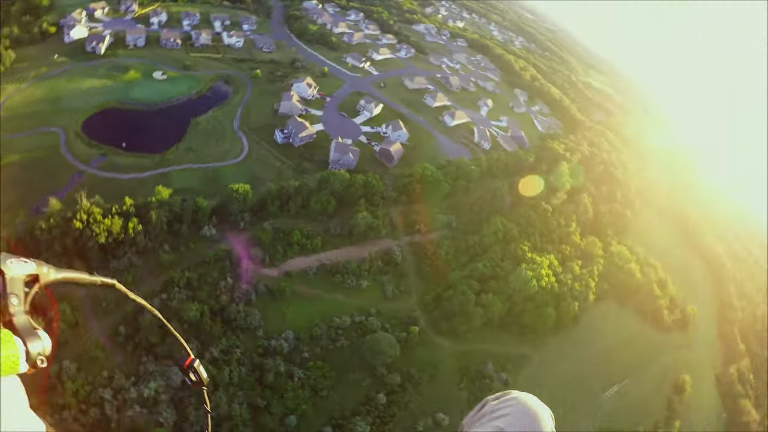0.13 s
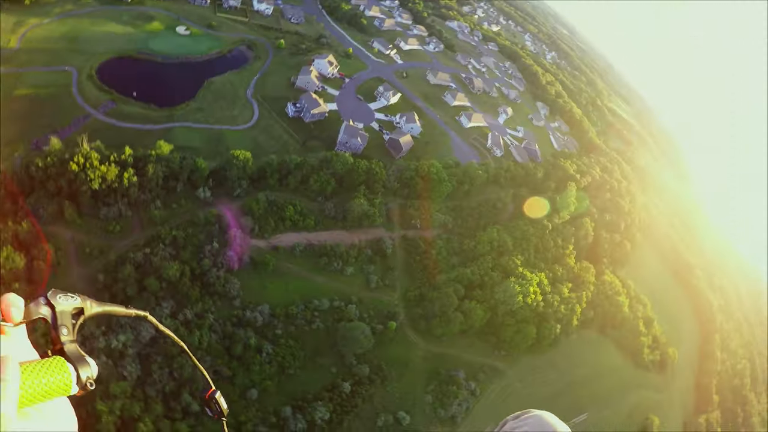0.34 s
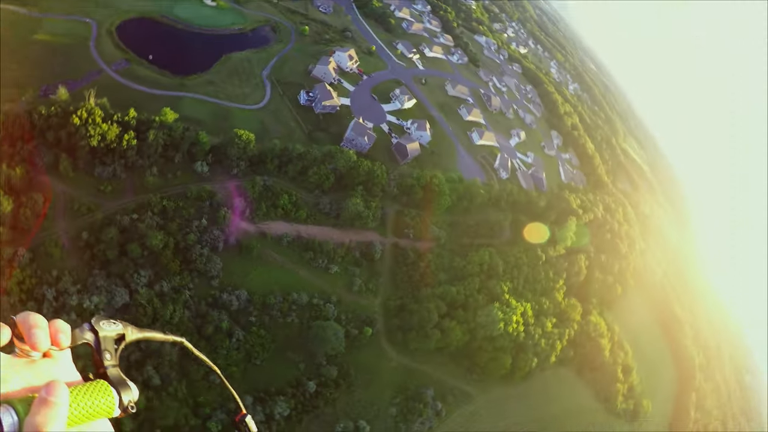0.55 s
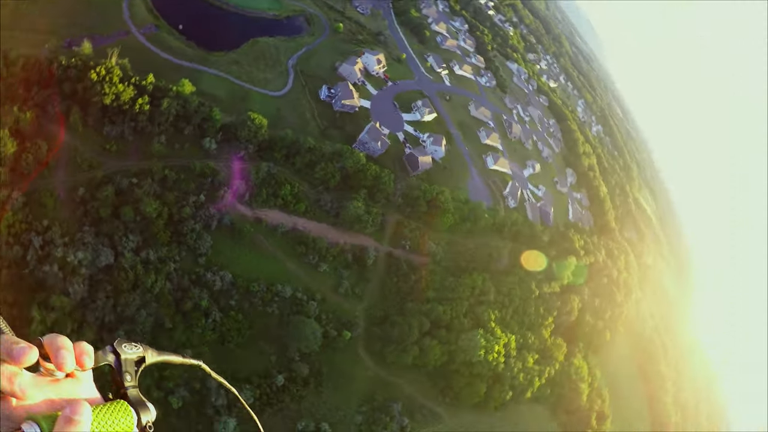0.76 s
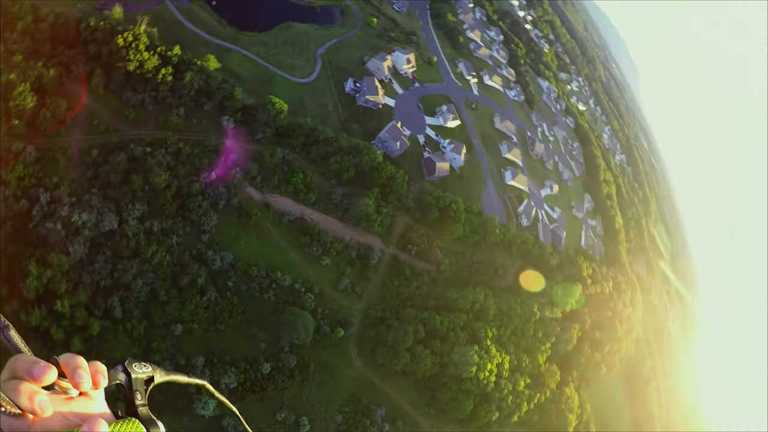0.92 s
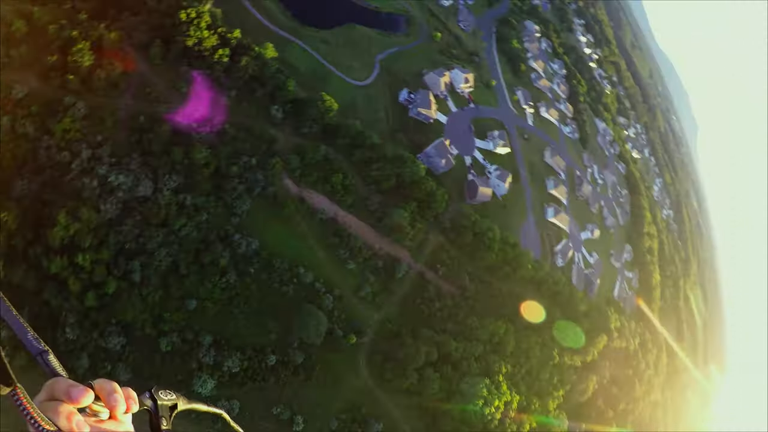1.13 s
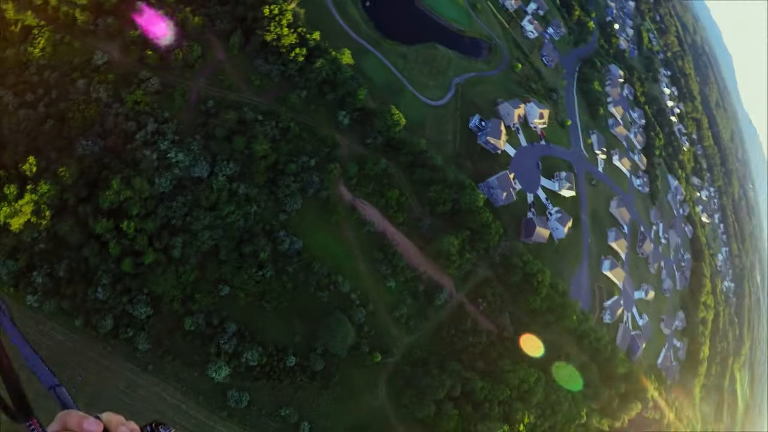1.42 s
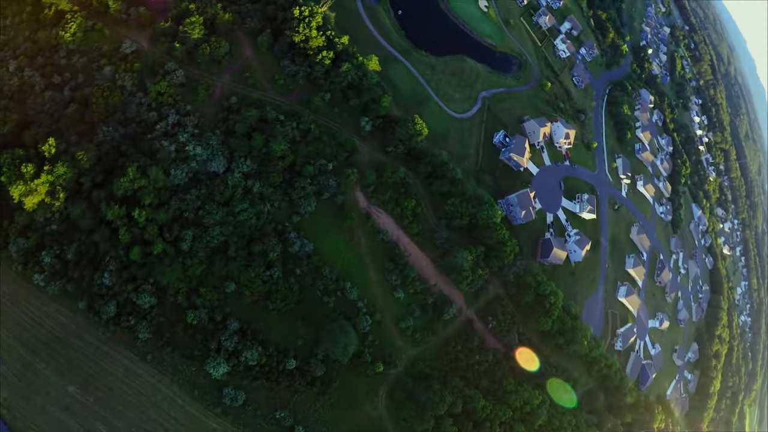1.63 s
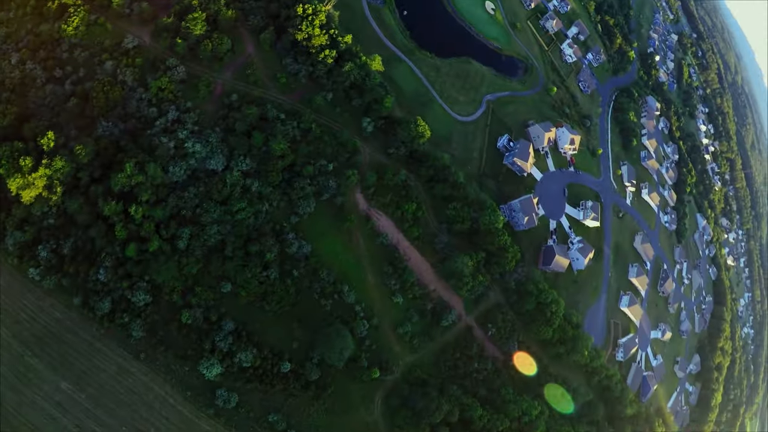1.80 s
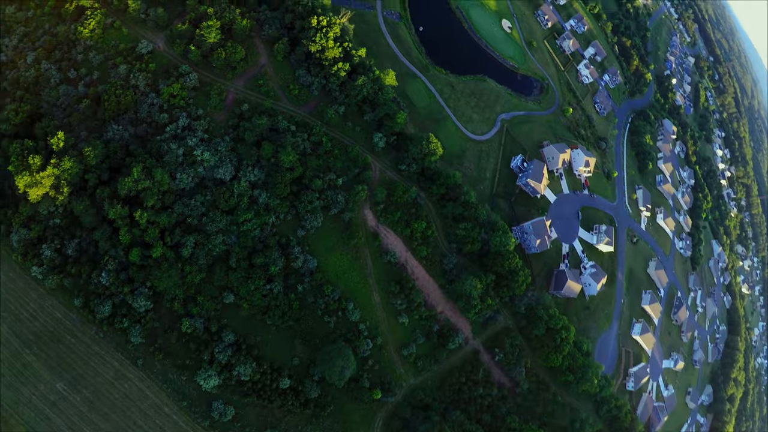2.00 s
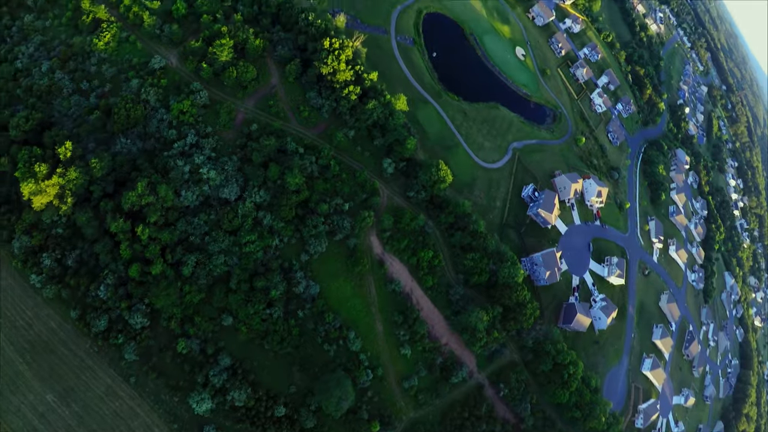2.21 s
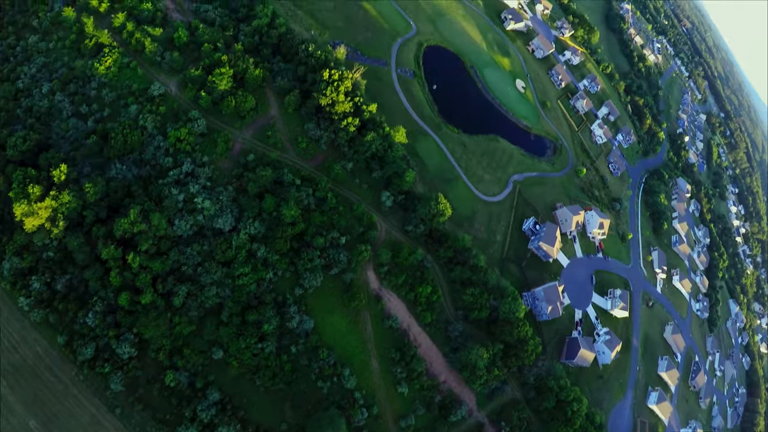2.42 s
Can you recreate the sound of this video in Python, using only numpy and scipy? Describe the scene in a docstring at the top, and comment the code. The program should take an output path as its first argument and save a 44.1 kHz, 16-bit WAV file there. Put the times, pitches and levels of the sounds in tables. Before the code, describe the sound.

Wind buffets an exposed microphone aboard a powered paraglider, with dull low rumble and sharp pops. A breathy rush throbs with the propeller, slowly speeding up and strengthening, with a strong late burst. Open air, close microphone.

```python
"""Gusts buffet the microphone port of a powered paraglider: a dull rumble of shaped noise with sharp pops.
Over it a brighter rush, noise ringing the resonances of the housing, throbs once per propeller blade
as the engine slowly spins up. A narrow ring of the housing wakes up late, and a thin treble of air
flickers on top. Faint circuit hiss and a comb of steady sine whine lie underneath."""
import sys
import numpy as np
from scipy import signal
from scipy.fft import rfft, irfft, next_fast_len
from scipy.io import wavfile
from scipy.ndimage import uniform_filter1d

SR = 44100
rng = np.random.default_rng(int(sys.argv[2]) if len(sys.argv) > 2 else 0)


def materialize(psi):
    """Save the field psi as 16-bit PCM at rate SR to the path in sys.argv[1].

    A 1-D psi becomes a single channel; in a 2-D psi each row is a channel.
    """
    bounded = np.clip(np.atleast_2d(psi).T, -1, 1)
    quanta = np.round(bounded * 32767).astype(np.int16)
    wavfile.write(sys.argv[1], SR, quanta)


N = 112454


def undb(db):
    """Gain of a level in dB."""
    return 10 ** (np.asarray(db) / 20)


def read(table, hz):
    """A spectrum table read on a log-frequency axis."""
    table_hz, values = np.array(table, float).T
    return np.interp(np.log(np.maximum(hz, 1)), np.log(table_hz), values)


def follow(table, t):
    """Moving curves drawn through a table: time in the first column, one curve per other column."""
    rows = np.array(table, float)
    return [np.interp(t, rows[:, 0], column) for column in rows[:, 1:].T]


def walk(rate):
    """Random levels held 1 / rate s and slewed twice, without slow drift; spread 1."""
    hold = max(int(SR / rate), 1)
    steps = np.repeat(rng.standard_normal(N // hold + 1), hold)
    slewed = uniform_filter1d(uniform_filter1d(steps, hold), hold)[:N]
    level = slewed - uniform_filter1d(slewed, 5 * hold)
    return level / level.std()


def bands(colour, gain):
    """Coloured noise, rms 1 before the gains, in overlapping half octaves that each move on their own gain."""
    size = next_fast_len(N)
    hz = np.arange(size // 2 + 1) * SR / size
    noise = rfft(rng.standard_normal(size)) * undb(colour(hz))
    half_octave = 2 * np.log2(np.maximum(hz, 1))
    out = 0
    for k in range(7, 29):  # centres from 11 Hz to 16 kHz
        share = np.cos(np.pi / 2 * np.clip(half_octave - k, -1, 1)) ** 2
        out = out + irfft(noise * share, size)[:N] * gain(2 ** (k / 2))
    return out / irfft(noise, size).std()


def throb_gain(depth, chop):
    """Blade throb as a power swing around 1, kept above zero."""
    return np.sqrt(np.clip(1 + depth * chop, .05, 4))


HISS_DB = -80
WHINE_HZ, WHINE_DB, WHINE_FALL_DB = 1000, -91.5, -1.3  # spacing, lowest tone, step per tone


def circuit(t):
    """Even hiss and a faint comb of steady whine from 8 to 15 kHz, weaker towards the top."""
    hiss = undb(HISS_DB) * rng.standard_normal(N)
    whine = 0
    for k in range(8):
        turns = (k + 8) * WHINE_HZ * t + rng.random()
        whine = whine + undb(WHINE_FALL_DB * k) * np.sin(2 * np.pi * turns)
    return hiss + undb(WHINE_DB) * whine


# blade rate at the start, its rise, and the growth of that rise
BLADE_HZ, SPIN_UP_HZ_PER_S, SPIN_UP_HZ_PER_S2, BLADE_START_TURNS = 33.65, 4.1, .5, .13
BLADE_SCATTER_DB = 1.5
THROB_GROWTH_S = 1.3  # time in which the throb would grow by its full depth


def blades(t, lag_turns=0):
    """A swell for each blade pass, each of its own size, deepening as the engine takes load."""
    spin_up = SPIN_UP_HZ_PER_S * t ** 2 / 2 + SPIN_UP_HZ_PER_S2 * t ** 3 / 3
    turns = BLADE_START_TURNS - lag_turns + BLADE_HZ * t + spin_up
    sizes = undb(BLADE_SCATTER_DB * rng.standard_normal(N // 100))
    size = sizes[(turns + .25).astype(int)]  # a new size a quarter turn ahead of each crest
    wave = np.cos(2 * np.pi * turns) + 0.34 * np.cos(4 * np.pi * turns)
    return wave * size * np.clip(0.1 + t / THROB_GROWTH_S, 0, 1)


# Spectrum of the top treble of the airstream: frequency_hz, density_db (per Hz, relative)
AIR_SPECTRUM = [(5000, -29), (7000, 1.5), (9000, -2), (12000, -5), (15500, -13)]


def air(level_db, chop):
    """The thin top of the airstream: treble noise flickering in quick puffs and lightly throbbing."""
    puffs = undb(.9 * walk(rate=240)) * throb_gain(0.28, chop)
    return undb(level_db) * bands(lambda hz: read(AIR_SPECTRUM, hz), lambda hz: puffs)


RING_HZ, RING_WIDTH_HZ = 1625, 110  # width where the ring is 6 dB down
# Level of the narrow housing ring over time: start_s, level_db (before the throb)
RING_LEVEL = [(0, -82), (1.5, -76), (1.88, -70), (1.93, -61), (2.07, -65), (2.12, -58), (2.28, -68),
              (2.35, -58), (2.54, -61)]


def ring(t, chop):
    """A narrow resonance of the housing that wakes up late, pumped by the blade passes."""
    colour = lambda hz: -20 * np.log10(1 + (2 * (hz - RING_HZ) / RING_WIDTH_HZ) ** 2)
    pump = throb_gain(0.6, chop)
    level_db, = follow(RING_LEVEL, t)
    return undb(level_db) * bands(colour, lambda hz: pump)


# Broad slope of the rush: frequency_hz, density_db (per Hz, relative)
RUSH_SPECTRUM = [(300, -18), (700, -1), (1000, 2.5), (1450, -0.5), (2100, -4.5), (3300, -7.5), (4000, -8),
                 (4550, -18), (6400, -16), (6900, -22.5), (7900, -26.5), (9200, -32), (15500, -48)]
# Resonances of the housing: centre_hz, width_hz, lift_db
HOUSING_RESONANCES = [(1580, 81, 2), (2790, 420, 5.5), (5220, 1300, 11)]
# How deeply the blades chop each part of the rush: frequency_hz, throb_depth (0-1, scales the swells)
THROB_DEPTH = [(700, 0.2), (1600, 0.34), (2800, 0.24), (4000, 0.1), (5500, 0.59), (8500, 0.45),
               (12000, .15)]
# Rush over time, before puffs and throb: start_s, level_db, air_db (top treble against the rush)
RUSH_LEVEL = [(0, -60, -11), (.2, -57, -39), (.42, -54.5, -25), (.75, -52, -22.5), (.84, -51, -25),
              (.87, -45.5, -41), (.93, -48, -38), (1.1, -48.5, -39), (1.14, -48.5, -35), (1.17, -54.5, -25),
              (1.22, -58.5, -19), (1.32, -56, -19.5), (1.55, -53, -21.5), (1.9, -51.5, -20.5),
              (2.09, -49.5, -23), (2.115, -41, -22.5), (2.16, -42, -22), (2.2, -45, -24),
              (2.26, -46.5, -22), (2.28, -54, -21.5), (2.305, -45, -22.5), (2.54, -45, -20)]


def rush(level_db, chop):
    """Air tears past the housing and rings it, flickering in quick shared puffs and chopped by the blades."""
    def colour(hz):
        lift = sum(db / (1 + (2 * (hz - centre) / width) ** 2) for centre, width, db in HOUSING_RESONANCES)
        return read(RUSH_SPECTRUM, hz) + lift

    puffs = walk(rate=220)

    def gain(hz):
        own_flicker = 0.43 * walk(rate=90)  # drawn anew for each band
        return undb(puffs + own_flicker) * throb_gain(read(THROB_DEPTH, hz), chop)

    return undb(level_db) * bands(colour, gain)


POP_WIDTH_S = .00042  # standard deviation of the bump
# Single sharp pushes of air on the port: centre_s, peak_db
POP_PUSHES = [(0.4049, -20), (.4765, -21.5), (1.2921, -26.5), (1.831, -23), (1.945, -19), (1.962, -26),
              (2.0453, -19.5), (2.177, -15)]


def pops(t):
    """Each push is one short bump of pressure with a shallow dip on both sides."""
    centre_s, peak_db = np.array(POP_PUSHES).T
    u = ((t[:, None] - centre_s) / POP_WIDTH_S) ** 2
    bump = np.exp(-u / 2) - np.exp(-u / 18) / 3
    return bump / (1 - 1 / 3) @ undb(peak_db)  # each bump scaled to peak at 1


SUB_RISE_DB_PER_S = 4.5
LOPSIDED = .045  # share of the squared pressure
LOW_LAG_TURNS = .1  # the rumble throbs this far behind the rush
# Spectrum of pressure eddies at the port: frequency_hz, density_db (per Hz, relative)
RUMBLE_SPECTRUM = [(12, -10), (22, -7.5), (54, -0.5), (200, -1.5), (380, -4.5), (480, -8), (560, -14),
                   (660, -20), (780, -27), (1100, -35.5), (2000, -67.5)]
# Gusts over time: start_s, level_db (before the eddy gains),
# bass_db (deep bass; its mean is removed), edge_db (lift of the upper edge)
GUST_LEVELS = [(0, -34, -8.5, 3.5), (.19, -32, -6.5, 6), (.3, -31, 0.5, 7.5), (.37, -31.5, -3.5, 7),
               (.45, -30, 1, 4.5), (.53, -30.5, -5.5, 7.5), (.6, -26, -4, -3.5), (.78, -25.5, -7, 3),
               (.845, -27.5, 1, 1), (.87, -18.5, -8.5, -3), (.95, -23.5, -2, -0.5), (1.0, -25.5, -4.5, 2.5),
               (1.08, -23, -9.5, -4), (1.145, -21, -6, 0), (1.165, -27.5, 0, -5), (1.19, -31, -4, 1.5),
               (1.24, -36.5, -4.5, 1), (1.27, -32.5, -9, -1), (1.3, -29, -11.5, -4), (1.5, -28.5, 1, -3),
               (1.6, -29.5, -2, 1.5), (1.68, -29.5, 2, 0.5), (1.8, -27.5, -3, -3), (1.9, -28.5, -4, -4.5),
               (1.96, -28, 1, -10), (2.03, -28, -1.5, 4), (2.095, -29, 0.5, -2), (2.115, -22.5, 2, 3),
               (2.15, -20.5, 3.5, -8), (2.19, -24, -4, 4), (2.24, -25.5, -4, 0), (2.265, -27, 2, 1),
               (2.275, -35.5, 7, 6), (2.295, -33.5, 5, 2), (2.31, -27, -5.5, 4), (2.4, -27, 1, -1),
               (2.46, -27, 1.5, 3), (2.54, -29, -7, 6)]


def rumble(t, chop):
    """Eddies thud on the port, pushing harder than they pull; the top edge throbs, the deep bass swells alone."""
    level_db, bass_db, edge_db = follow(GUST_LEVELS, t)
    eddies, thuds = 0.5 * walk(rate=160), 1.73 * walk(rate=260)
    tilt = bass_db - bass_db.mean()
    sub = SUB_RISE_DB_PER_S * (t - t.mean())

    def ramp(ratio):  # 0 to 1 over one octave
        return np.clip(np.log2(ratio), 0, 1)

    def gain(hz):
        top = thuds * ramp(hz / 260) + edge_db * ramp(hz / 400) + 1.1 * chop * ramp(hz / 450)
        bass = tilt * ramp(160 / hz) + sub * ramp(60 / hz)
        return undb(eddies + top + bass)

    push = bands(lambda hz: read(RUMBLE_SPECTRUM, hz), gain)
    squared = push ** 2
    lopsided = LOPSIDED * (squared - uniform_filter1d(squared, SR // 20))
    return undb(level_db) * (push + lopsided)


def scene():
    """Wind, propeller throb and circuit noise at one microphone."""
    t = np.arange(N) / SR
    rush_db, air_db = follow(RUSH_LEVEL, t)
    chop = blades(t)
    background = circuit(t) + air(rush_db + air_db, chop)
    housing = ring(t, chop) + rush(rush_db, chop)
    port = pops(t) + rumble(t, blades(t, LOW_LAG_TURNS))
    return (background + housing + port)[None]


CEILING = 0.22  # full scale is 1
SETTLE_S, TOP_HZ = .004, 15680


def record(dry):
    """The input stage settles, rounds the biggest thuds and cuts the top."""
    settle = np.clip(np.arange(N) / SR / SETTLE_S, 0, 1)
    soft = CEILING * np.tanh(dry / CEILING) * settle
    top_cut = signal.ellip(14, 1, 60, TOP_HZ, fs=SR, output="sos")
    return signal.sosfilt(top_cut, soft)


dry = scene()
out = record(dry)
materialize(out)
```